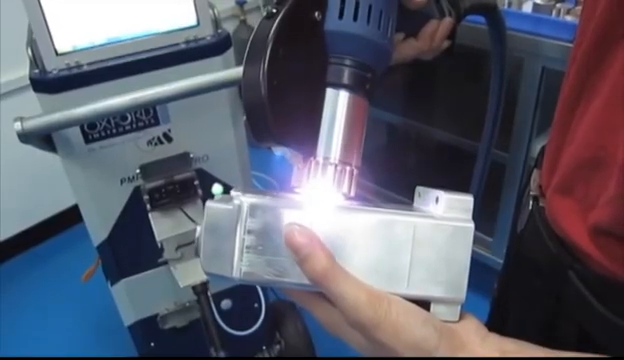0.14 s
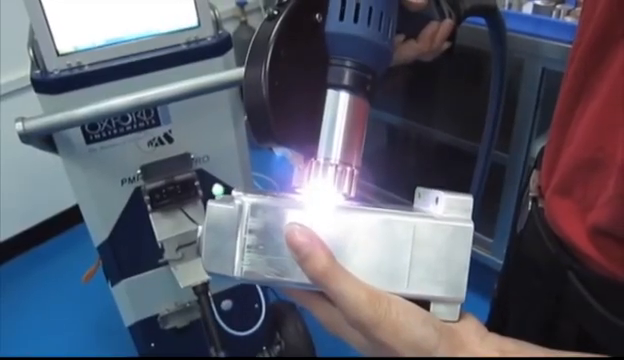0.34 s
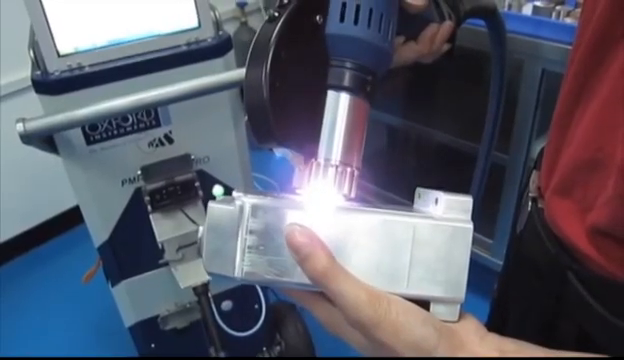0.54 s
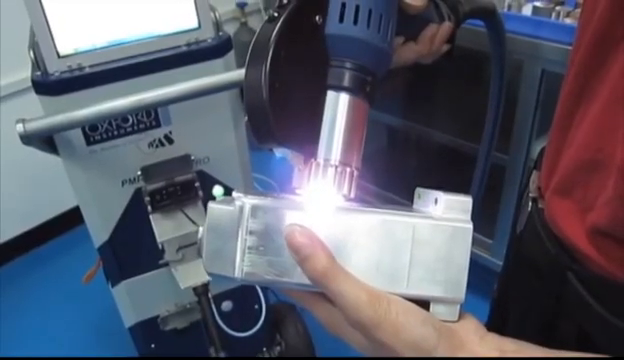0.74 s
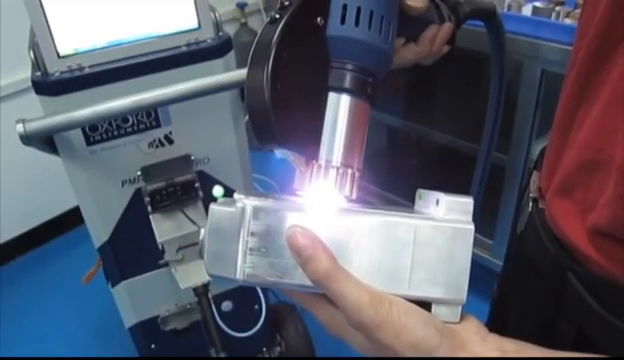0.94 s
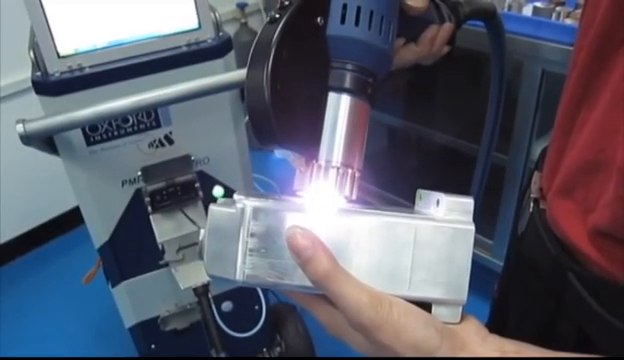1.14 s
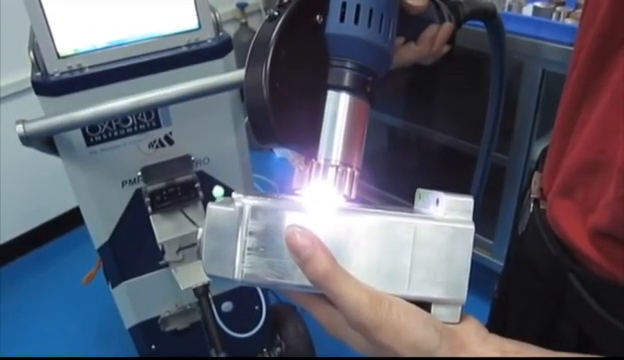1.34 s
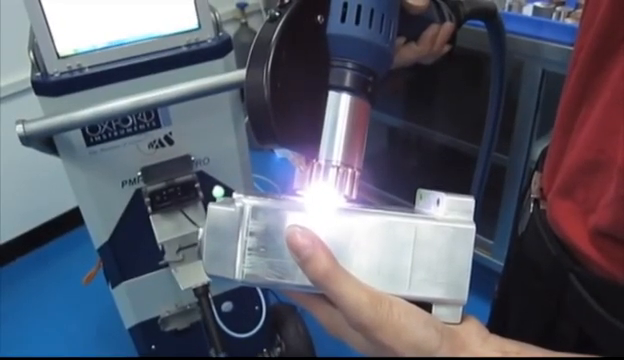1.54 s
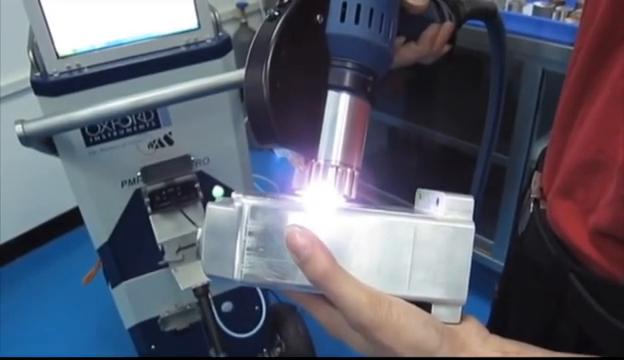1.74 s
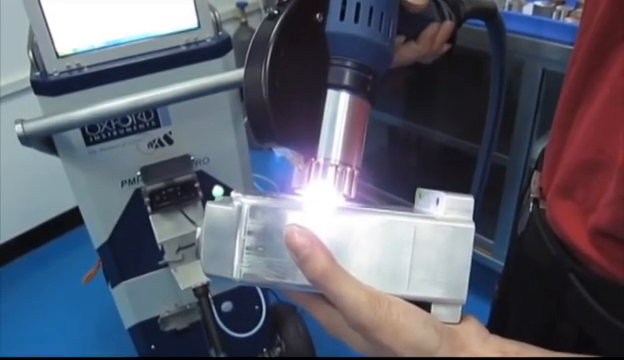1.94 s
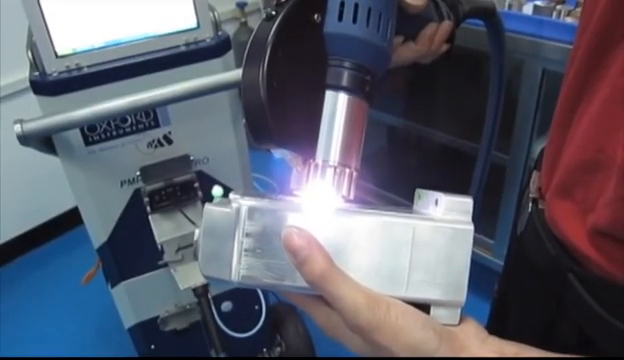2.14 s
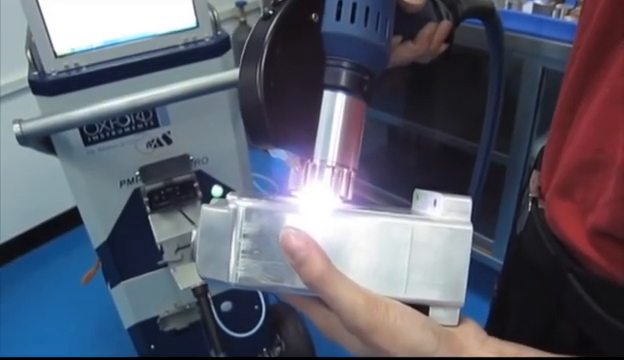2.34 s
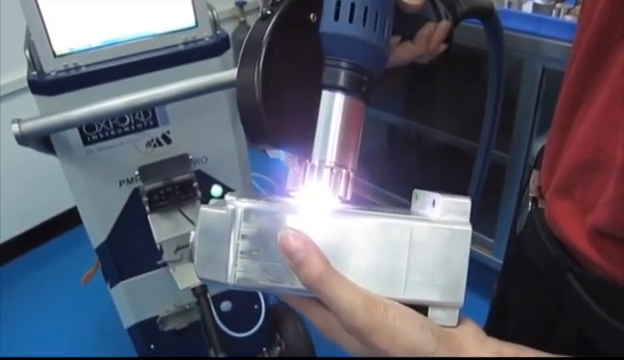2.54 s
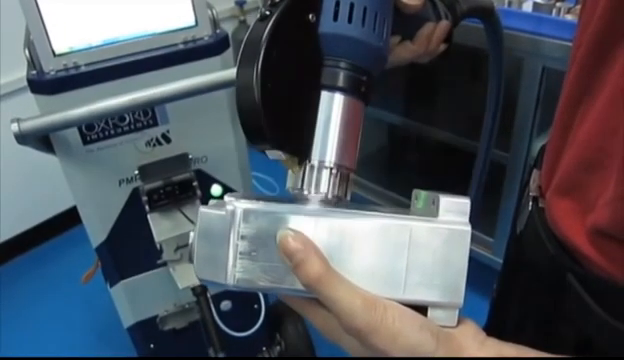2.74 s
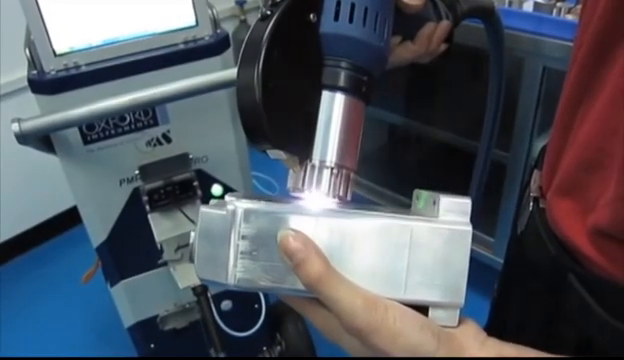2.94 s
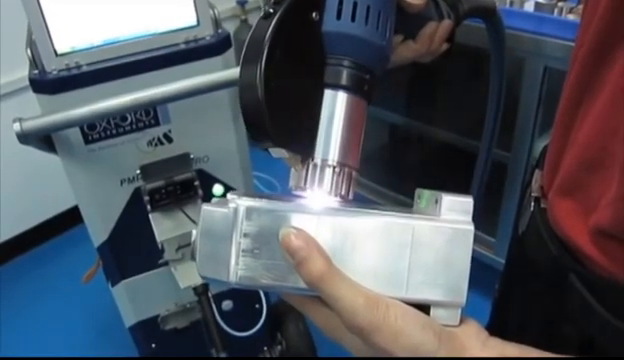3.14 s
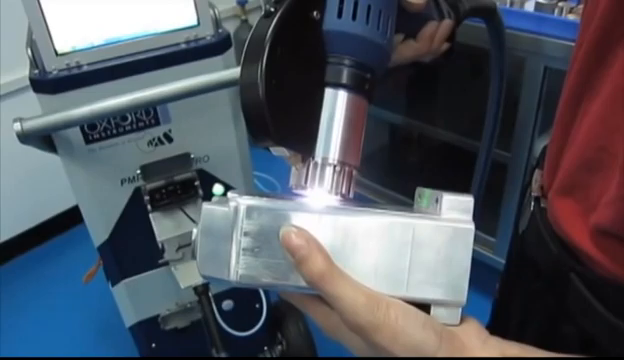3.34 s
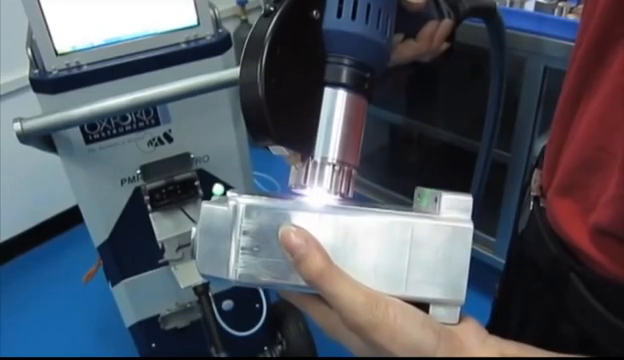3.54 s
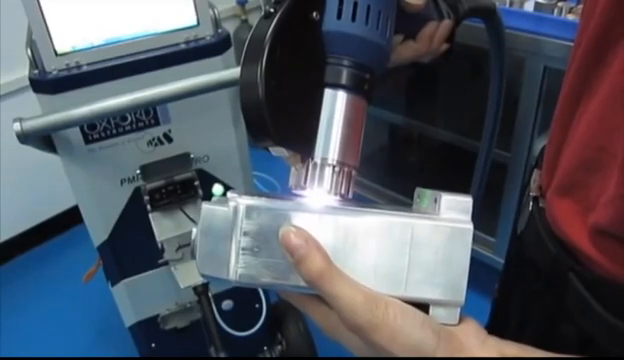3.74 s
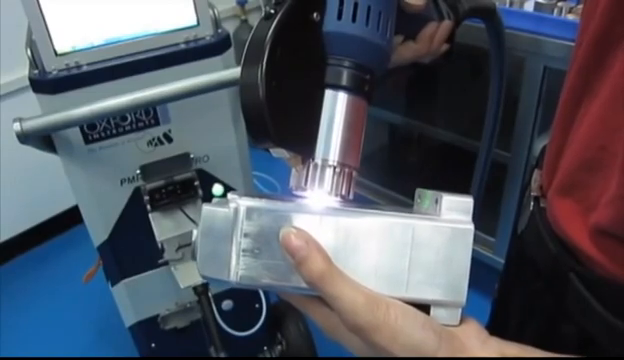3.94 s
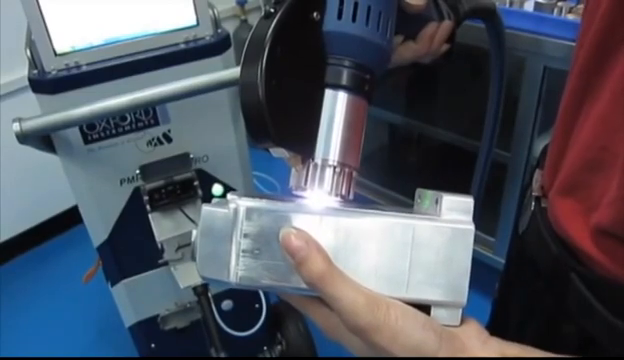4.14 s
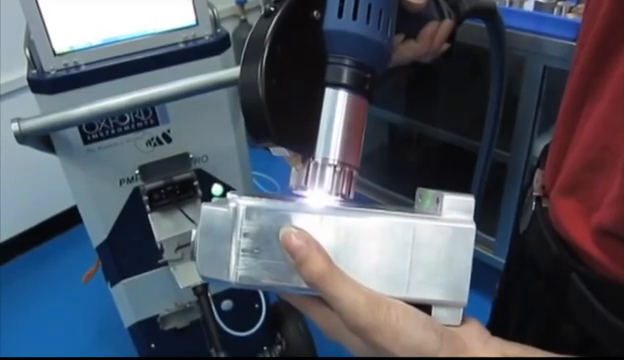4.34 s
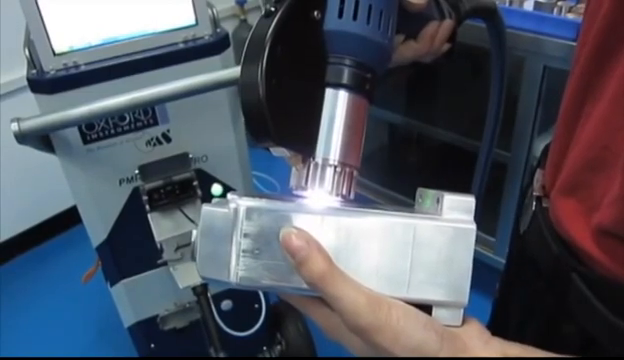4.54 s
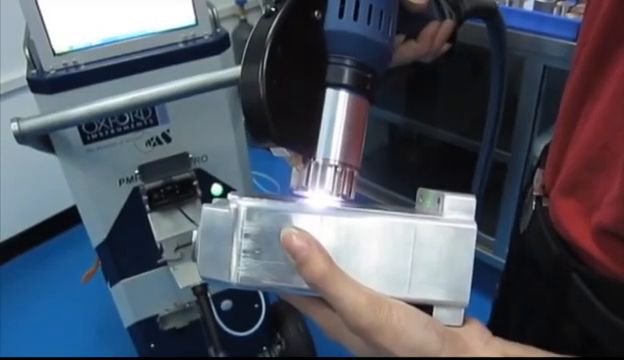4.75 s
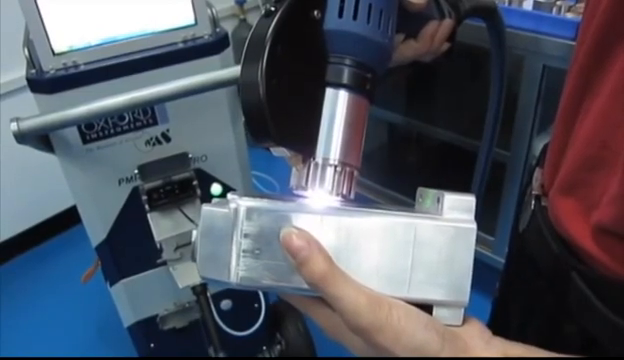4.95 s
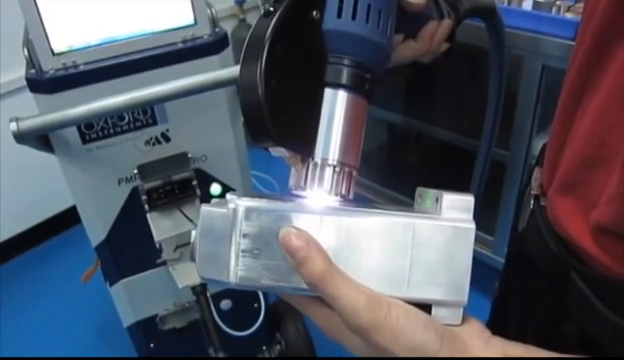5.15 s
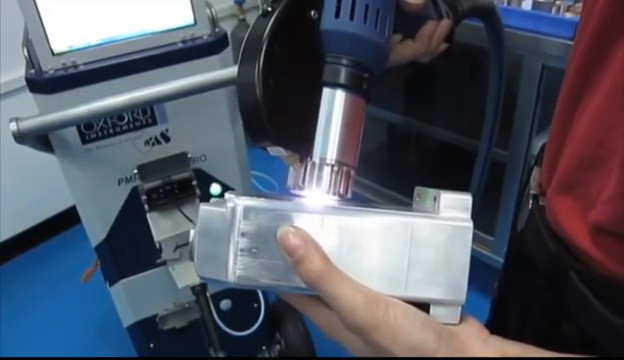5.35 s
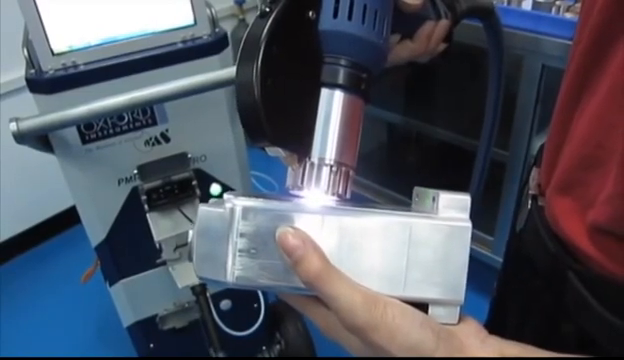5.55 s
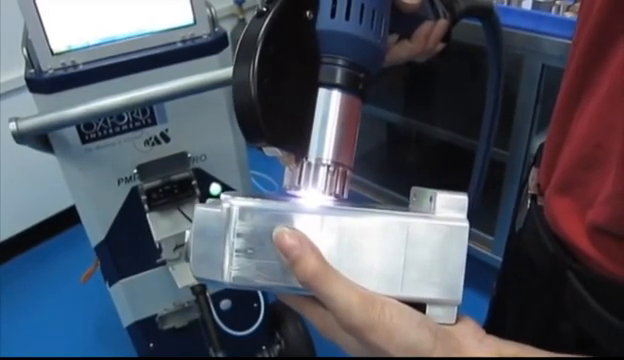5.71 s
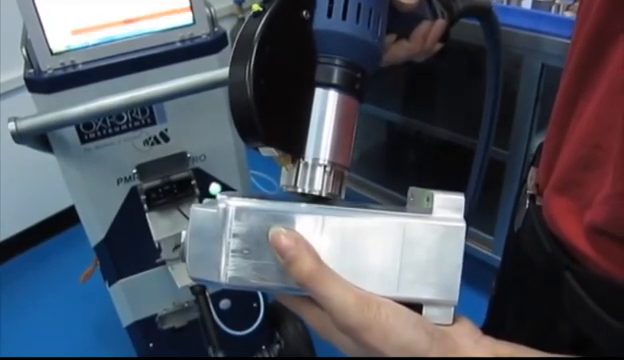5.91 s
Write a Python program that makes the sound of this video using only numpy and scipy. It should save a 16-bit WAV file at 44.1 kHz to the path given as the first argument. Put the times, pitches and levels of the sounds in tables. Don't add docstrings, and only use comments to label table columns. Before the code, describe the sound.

A hand-held spark probe pressed to a metal block buzzes hard and fast, already running at the start, with rough crackles and spitting low pops. It cuts out for a moment, then resumes as a lower, steadier, cleaner buzz until it stops abruptly. The hard-walled workshop carries the tail on, over faint ventilation. Close stereo pickup with small, thin-bass microphones.

```python
import sys
import numpy as np
from scipy import signal
from scipy.fft import rfft, irfft
from scipy.io import wavfile
from scipy.ndimage import map_coordinates

SR = 44100
rng = np.random.default_rng(int(sys.argv[2]) if len(sys.argv) > 2 else 0)


def invert_db(level):
    return 10 ** (np.asarray(level, dtype=float) / 20)


def transcribe(u):
    v = np.clip(np.atleast_2d(u).T, -1, 1)
    q = np.round(v * 32767).astype(np.int16)
    wavfile.write(sys.argv[1], SR, q)


N = 268039
LEAD = 32768
TOTAL = N + LEAD

# first spark t/s, last spark t/s, spark rate f/Hz
SPARK_CLOCK = [
    (-.7, 2.6721, 342.99),
    (2.792, 5.7164, 291.02),
]
# t/s, level/dB
SPARK_STRENGTH = [
    [(0.0, -40), (0.11, -38), (1.08, -38), (1.62, -40), (2.59, -39), (2.66, -40)],
    [(2.8, -40), (3.52, -37), (4.73, -37), (5.71, -38)],
]
# multiple of the spark rate, left level/dB, right level/dB
HARD_OVERTONES = [(1, -45.3, -42.6), (2, -48.6, -47.5), (3, -51.2, -50.5), (4, -52.5, -49.1),
                  (5, -53.9, -47.6), (6, -60.1, -44.0), (7, -52.4, -65.2), (8, -51.3, -54.6),
                  (9, -50.8, -49.9), (10, -56.5, -53.7), (11, -54.1, -50.5), (12, -59.2, -61.4),
                  (13, -66.0, -55.8), (14, -49.6, -51.9), (15, -42.7, -48.9), (16, -63.1, -56.4),
                  (17, -51.2, -42.9), (18, -42.3, -59.0), (19, -48.9, -40.5), (20, -43.9, -47.3),
                  (21, -52.1, -56.5), (22, -45.6, -45.7), (23, -50.3, -52.4), (24, -54.7, -55.3),
                  (25, -58.7, -51.0), (26, -51.9, -54.4), (27, -50.8, -61.1), (28, -54.9, -55.1),
                  (29, -64.7, -59.6), (30, -69.6, -64.6)]
# multiple of the spark rate, left level/dB, right level/dB
CALM_OVERTONES = [(1, -44.6, -49.6), (2, -45.2, -48.1), (3, -47.2, -48.3), (4, -53.5, -50.6),
                  (5, -64.6, -50.4), (6, -56.9, -51.8), (7, -52.7, -54.7), (8, -53.1, -68.3),
                  (9, -56.6, -64.5), (10, -58.0, -61.4), (11, -59.3, -58.4), (12, -55.8, -62.0),
                  (13, -54.6, -53.1), (14, -60.6, -59.6), (15, -59.1, -60.1), (16, -56.3, -58.6),
                  (17, -57.3, -51.9), (18, -46.9, -56.3), (19, -48.3, -42.7), (20, -54.4, -40.1),
                  (21, -42.4, -43.5), (22, -40.4, -46.8), (23, -44.7, -46.5), (24, -53.4, -56.6),
                  (25, -60.6, -59.4), (26, -47.0, -46.3), (27, -60.9, -51.3), (28, -55.3, -57.1),
                  (29, -49.6, -61.6), (30, -52.7, -56.0)]
# f/Hz, left level/dB, right level/dB
THIN_TOP = [
    [(10500, -55, -88), (10660, -110, -110), (11820, -92, -66.5), (11900, -62.5, -66.5), (13000, -66, -69),
     (13470, -87, -94), (14340, -49, -43), (13300, -70, -97), (15860, -71, -57), (16000, -102, -74.5)],
    [(8830, -44, -72), (9700, -69.5, -71), (9630, -78, -48.5), (12200, -110, -110), (11350, -74, -62),
     (12000, -61, -63.5), (13970, -82, -64.5), (14200, -58, -90), (14100, -71, -85), (16600, -64, -48),
     (15600, -87, -81)],
]
# random level/dB, share carried from the spark before, fall t/ms,
# spit share, crack wobble share
UNEVENNESS = [
    (-34, 1, 0.92, 4.42, 0.11),
    (-47.5, 0.013, 1.12, 10.8, 0.058),
]
# t/ms, left share, right share
METAL_ECHOES = [
    (.25, 0.3, 0.26),
    (.55, 0.093, 0.18),
    (1.6, 0.05, 0.046),
]
# f/Hz, t60 t/s
HALL_DECAY = [(200, 0.13), (600, 0.46), (2000, 1), (4500, 0.81), (6500, 0.8), (9000, 0.61), (14000, 0.36)]
# f/Hz, level/dB
HALL_LEVEL = [(200, -40), (600, -10.5), (2000, -19.5), (4500, -0.5), (6500, -8.5), (9000, -3.5),
              (14000, -1)]
# f/Hz, level/dB per Hz
VENTILATION = [(30, -40), (60, -16), (90, -8), (216, 0), (360, -11), (870, -9), (1900, -17), (4000, -22),
               (9000, -35)]
NOZZLE_BOUNCES = [
    (15, 14, .7, .85),
    (44, 41, .7, .92),
]
# delay t/ms, sway t/ms, share
HAND_ECHO = [
    (1.302, 0.181, 0.17),
    (2.101, 0.17, 0.28),
]
# t/s, pressure drop level/dB
HARD_COLLAPSES = [(.0276, -27.5), (.048, -24.9), (.2113, -25.2), (.325, -25), (.5203, -27.1),
                  (.6748, -27.6), (.7331, -27.5), (.7944, -26.9), (.8964, -26.6), (1.1471, -23.8),
                  (1.1617, -25.7), (1.2113, -26.4), (1.3046, -26), (1.3367, -26.2), (1.3658, -27.2),
                  (1.4416, -27.1), (1.5087, -27), (1.5378, -22.9), (1.5699, -25.8), (1.637, -25.8),
                  (1.6778, -27.1), (1.8119, -25.9), (1.8352, -27.1), (1.9577, -27.3), (2.0976, -27.3),
                  (2.2142, -26.6), (2.29, -25.6), (2.6603, -26.6)]
# t/s, pressure drop level/dB
CALM_COLLAPSES = [(2.7921, -33.8), (3.0807, -35.4), (3.5893, -40), (3.6752, -34.7), (3.6992, -37.3),
                  (3.9363, -38), (4.0497, -38.5), (4.1425, -39.6), (4.2868, -36.9), (4.4105, -39.7),
                  (4.5583, -32.5), (4.6098, -35.7), (4.7164, -33.8), (4.7232, -34.7), (4.8126, -37.7),
                  (4.9466, -38.8), (4.9638, -38.3), (5.0016, -38.8), (5.0222, -35.5), (5.084, -39.6),
                  (5.1356, -34.8), (5.2455, -35.8), (5.4929, -38.7), (5.6338, -39.8), (5.7094, -37.2)]
# rate f/Hz, weakest level/dB, spread level/dB, pitting time t/s
SMALL_COLLAPSES = [
    (26.8, -30, 4.5, .01),
    (18, -45.5, 8, 1.2),
]


def read(points, hz):
    f, value = np.transpose(points)
    return np.interp(np.log(hz + 1), np.log(f + 1), value)


def train(times, sizes):
    place = times * SR + LEAD
    at = np.floor(place).astype(int)[:, None] + np.arange(-16, 17)
    gap = at - place[:, None]
    shape = np.sinc(gap) * np.cos(np.pi * gap / 36) ** 2
    return np.bincount(at.ravel(), (sizes[:, None] * shape).ravel(), TOTAL)


def causal(points):
    log_gain = read(points, np.abs(np.fft.fftfreq(4096, 1 / SR))) * np.log(10) / 20
    spectrum = np.exp(np.conj(signal.hilbert(log_gain)))
    return np.fft.ifft(spectrum).real[:2048]


def air():
    a, b = rng.standard_normal((2, N))
    colour = invert_db(read(VENTILATION, np.fft.rfftfreq(N, 1 / SR)))
    noise = irfft(rfft([a + 0.13 * b, a - 0.18 * b]) * colour, N)
    return invert_db(-72) * noise / noise.std()


def workshop():
    taps = np.zeros((2, SR))
    at = np.arange(300, SR - 20, 20) + rng.integers(0, 20, (2, (SR - 301) // 20))
    np.put_along_axis(taps, at, rng.choice([-1., 1.], at.shape), 1)
    hz, t, z = signal.stft(taps, SR, nperseg=256)
    z = z * invert_db(-60 * t / read(HALL_DECAY, hz)[:, None])
    z = z / np.sqrt(np.sum(abs(z) ** 2, (0, 2), keepdims=True))
    even = signal.istft(z, SR, nperseg=256)[1][:, :SR]
    colour = invert_db(read(HALL_LEVEL, np.fft.rfftfreq(SR, 1 / SR)))
    return irfft(rfft(even / np.linalg.norm(even[0])) * colour, SR)


def hands(near):
    at, out = np.arange(TOTAL), []
    treble = signal.butter(2, 1500, "high", fs=SR)
    for ear, (delay_ms, sway_ms, share) in zip(near, HAND_ECHO):
        sway = sum(np.sin(2 * np.pi * (f * at / SR + rng.random())) * 0.163 / f for f in (.15, .3, .55, 1.1))
        path = at - (delay_ms + sway_ms * sway) * SR / 1000
        echo = map_coordinates(ear, [path], order=3)
        out.append(ear + share * signal.lfilter(*treble, echo))
    return np.array(out)


def arc_drops(times, burn):
    uneven_db, carry = UNEVENNESS[burn][:2]
    per_s, weakest_db, spread_db, pitted_s = SMALL_COLLAPSES[burn]
    heat = invert_db(uneven_db) * (rng.exponential(1, len(times)) - 1)
    heat = np.minimum(heat, 0.68 * invert_db(weakest_db))

    chance, size = rng.random((len(times), 2)).T
    pitting = np.minimum((times - times[0]) / pitted_s, 1)
    small = chance < per_s / SPARK_CLOCK[burn][2] * pitting
    collapse = small * invert_db(weakest_db + spread_db * size)
    s, db = np.transpose([HARD_COLLAPSES, CALM_COLLAPSES][burn])
    collapse[np.abs(times[:, None] - s).argmin(0)] = invert_db(db)

    following = np.r_[collapse[1:], 0]
    heat = np.where(following > 0, -.5 * carry * following, heat)
    heat = np.where(collapse > 0, collapse * (1 - .5 * carry), heat)
    return carry * np.r_[0, heat[:-1]] - heat


def pops(times, drops, burn):
    fall_ms, spit = UNEVENNESS[burn][2:4]
    ms = np.arange(1500) / SR * 1000
    step = signal.lfilter(*signal.butter(2, 4500, fs=SR), np.exp(-ms / fall_ms))
    spit_band = signal.butter(2, [900, 4400], "band", fs=SR)
    shared, out = rng.standard_normal(TOTAL), []
    for ear in (1, 2):
        echoes = np.zeros(200)
        echoes[5] = 1
        for echo in METAL_ECHOES:
            echoes[5 + round(echo[0] * SR / 1000)] = echo[ear]
        heard = drops * (1 + .28 * rng.standard_normal(len(drops)))
        thump = signal.oaconvolve(train(times, heard), np.convolve(step, echoes))[:TOTAL]
        puff = signal.oaconvolve(train(times, abs(drops)), np.exp(-ms / 2.0))[:TOTAL]
        fizz = puff * (shared + 1.2 * rng.standard_normal(TOTAL)) / 10
        out.append(thump + spit * signal.lfilter(*spit_band, fizz))
    return np.array(out)


def bounce(x, ear, burn):
    for row in NOZZLE_BOUNCES:
        loop = np.zeros(row[ear] + 1)
        loop[[0, -1]] = row[2 + burn], 1
        x = signal.lfilter(loop, loop[::-1], x)
    return x


def cracks(times, burn, walls):
    hz, wobble = SPARK_CLOCK[burn][2], UNEVENNESS[burn][4]
    s, db = np.transpose(SPARK_STRENGTH[burn])
    size = invert_db(np.interp(times, s, db - np.median(db)))
    size = size * (1 + wobble * rng.standard_normal(len(times)))
    pulses = train(times, -size * SR / hz / np.sqrt(2))

    overtones = [HARD_OVERTONES, CALM_OVERTONES][burn]
    lines = np.array([(k * hz, left, right) for k, left, right in overtones])
    filled = 1 + rfft(walls, 8 * SR)[:, np.round(8 * lines[:, 0]).astype(int)]
    lines[:, 1:] -= np.clip(20 * np.log10(abs(filled.T)), -4, 6)
    lines = np.vstack([lines, THIN_TOP[burn]])

    out = []
    for ear in (0, 1):
        crack = bounce(causal(lines[:, [0, ear + 1]]), ear, burn)
        out.append(signal.oaconvolve(pulses, crack)[:TOTAL])
    return np.array(out)


def scene():
    near, walls = np.zeros((2, TOTAL)), workshop()
    for burn, (first, last, hz) in enumerate(SPARK_CLOCK):
        times = last - np.arange(round((last - first) * hz) + 1)[::-1] / hz
        drops = arc_drops(times, burn)
        near += cracks(times, burn, walls) + pops(times, drops - drops.mean(), burn)
    far = signal.fftconvolve(near, walls, axes=1)[:, :TOTAL]
    return (hands(near) + far)[:, LEAD:] + air()


def low_pass(x):
    return signal.sosfilt(signal.butter(12, 15650, fs=SR, output="sos"), x)


def record(dry):
    thin = signal.lfilter(*signal.butter(2, 75, "high", fs=SR), dry)
    return low_pass(thin)


dry = scene()
out = record(dry)
transcribe(out)
```